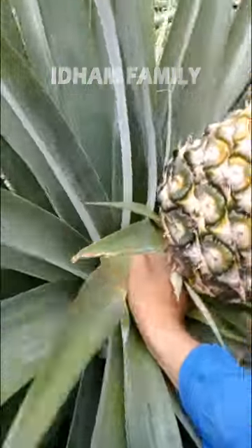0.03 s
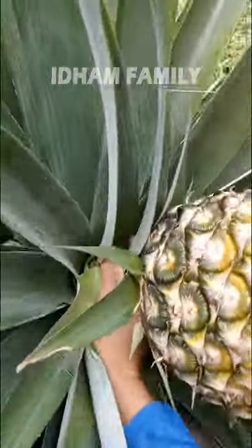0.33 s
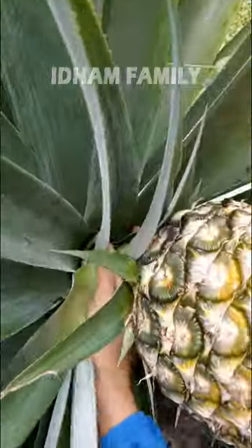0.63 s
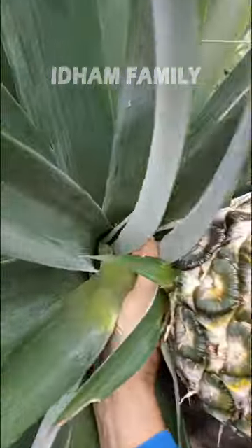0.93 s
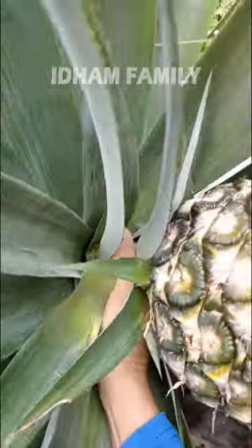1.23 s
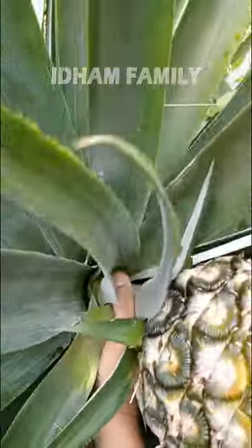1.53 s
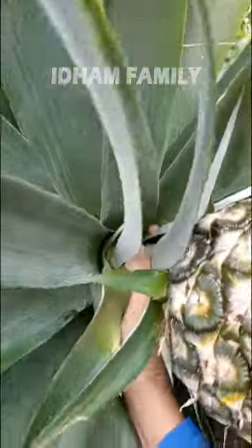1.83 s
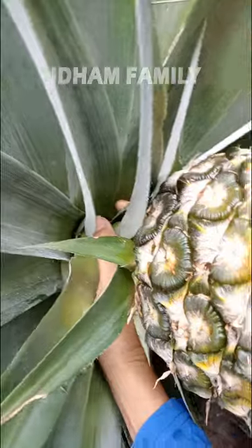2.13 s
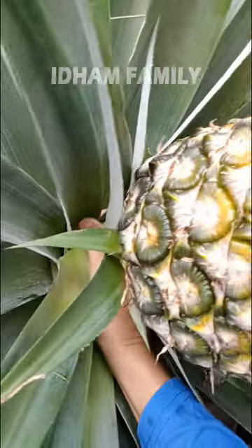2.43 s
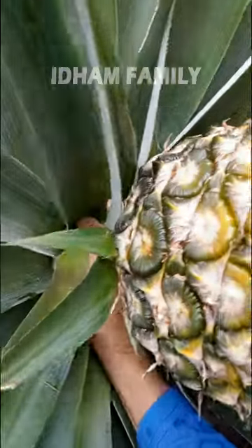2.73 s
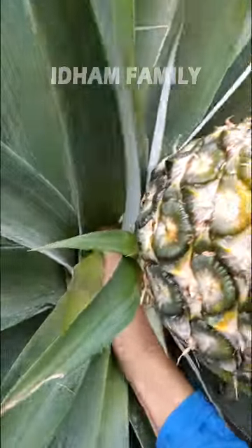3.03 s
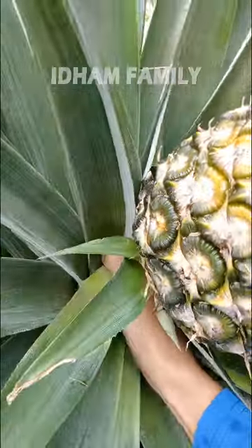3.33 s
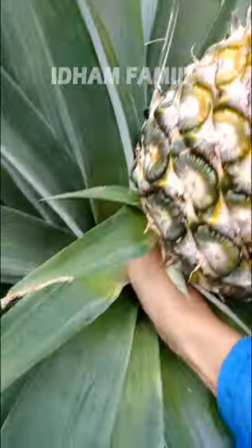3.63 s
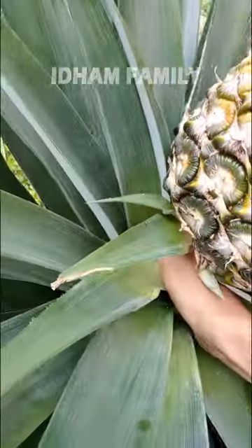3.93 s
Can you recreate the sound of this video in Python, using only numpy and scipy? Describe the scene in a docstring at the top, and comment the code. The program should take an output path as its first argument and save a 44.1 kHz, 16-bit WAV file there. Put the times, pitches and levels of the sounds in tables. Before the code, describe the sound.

Close up and outdoors, a hand moves stiff leaves in an uneven, crackling rustle dotted with short rasps and sharp snaps. The rustle eases midway, then builds again, while the stalk knocks softly over a faint low breeze.

```python
"""Hand in a pineapple plant

Outdoors, close to the microphone, a hand pushes in among the stiff leaves. Waxy blades slide over
each other in a fine stick-slip rustle, toothed edges rasp, spines flick and bent leaves snap free.
The heavy plant thuds dully as it is shifted; faint wind lies underneath."""
import sys
import numpy as np
from scipy import signal
from scipy.fft import rfft, irfft
from scipy.io import wavfile
from scipy.ndimage import uniform_filter1d

SR = 44100
rng = np.random.default_rng(int(sys.argv[2]) if len(sys.argv) > 2 else 0)


def inscribe(sig):
    """Save sig as 16-bit PCM at rate SR to the path in sys.argv[1].

    A 1-D sig is mono; a 2-D sig holds one channel per row.
    Samples are clipped to [-1, 1] before scaling.
    """
    pcm = np.round(np.clip(np.atleast_2d(sig).T, -1, 1) * 32767)
    wavfile.write(sys.argv[1], SR, pcm.astype(np.int16))


N = 176400
TIME = np.arange(N) / SR

# The leaves sliding. Each row: time in seconds, then the levels of dull rub, rustle and fizz in dB.
SLIDE_LEVELS = [(0.04, -33, -35, -41), (0.11, -43, -42, -47), (0.34, -39, -35, -37), (0.39, -40, -38, -47),
                (0.56, -38, -38, -49), (0.67, -41, -43, -50), (0.78, -40, -40, -48), (0.86, -45, -35, -45),
                (0.96, -45, -35, -45), (1.04, -48, -50, -56), (1.15, -41, -38, -50), (1.27, -49, -46, -56),
                (1.92, -53, -48, -59), (2.08, -49, -47, -58), (2.2, -48, -42, -55), (2.48, -39, -43, -54),
                (2.8, -58, -54, -63), (3.04, -42, -43, -51), (3.3, -43, -42, -52), (3.38, -41, -39, -47),
                (3.55, -44, -38, -45), (3.61, -43, -46, -52), (3.67, -41, -35, -40), (3.79, -34, -37, -43),
                (3.88, -44, -45, -52), (4.0, -42, -42, -47)]
# The rustle of the leaf edges. Each row: frequency in Hz, gain in dB.
RUSTLE_COLOUR = [(600, -8), (1500, -10), (3000, 3), (4000, -0.5), (4900, -12.5), (12000, -49)]
# The bright fizz of the waxy skin. Each row: frequency in Hz, gain in dB.
FIZZ_COLOUR = [(3000, -39), (5000, -3.5), (7600, -2.5), (9500, 6), (11200, -5), (16000, -16)]
CATCHES_PER_S = 170
PATCH_RANGE_HZ, PATCH_DECAY_S = (2300, 3900), 0.0006  # the note of a small patch of leaf


def amp(db):
    """Decibels to gain."""
    return 10 ** (np.asarray(db) / 20)


def unit(x):
    """Scales to rms 1."""
    return x / np.sqrt(np.mean(x ** 2) + 1e-20)


def burst(x, level_db, span_s=0.009):
    """Gives a short sound the energy of level_db held for span_s."""
    return x / np.linalg.norm(x) * np.sqrt(span_s * SR) * amp(level_db)


def add(mix, start_s, sound):
    """Mixes a sound in at start_s."""
    part = mix[max(round(start_s * SR), 0):][:len(sound)]
    part += sound[:len(part)]


def colour(x, points, size=4096):
    """Minimum-phase filter with the given (Hz, dB) outline."""
    points_hz, points_db = np.transpose(points)
    hz = abs(np.fft.fftfreq(size, 1 / SR))
    log_gain = np.log(amp(np.interp(np.log(hz + 1), np.log(points_hz), points_db)))
    taps = np.fft.ifft(np.exp(np.conj(signal.hilbert(log_gain)))).real
    return signal.fftconvolve(x, taps[:size // 2])[:len(x)]


def wander(rate_hz):
    """Smooth random motion of rms 1, mostly slower than rate_hz."""
    rolloff = 1 + (np.fft.rfftfreq(N, 1 / SR) / rate_hz) ** 4
    return unit(irfft(rfft(rng.standard_normal(N)) / rolloff, N))


def slips(per_s, spread_db):
    """Tiny random slips, mostly small, a few large."""
    size = amp(spread_db * np.minimum(rng.exponential(1, N), 5))
    return unit(size * rng.choice([-1., 1.], N) * (rng.random(N) < per_s / SR))


def catches(per_s, spread_db=14):
    """Sparse catches of leaf on leaf, their sizes spread evenly in decibels."""
    size = amp(-spread_db * rng.random(N))
    return size * np.sign(rng.standard_normal(N)) * (rng.random(N) < per_s / SR)


def ping(t, hz, decay_s):
    """The short note of a damped blade."""
    return np.sin(2 * np.pi * hz * t) * np.sqrt(t) * np.exp(-t / decay_s)


def moving_contact(x, depth_db, frame=512):
    """Narrow resonances come and go as the point of contact moves."""
    spectra = signal.stft(x, nperseg=frame)[2]
    field = rng.standard_normal(spectra.shape)
    for axis in (0, 1):  # smooth over frequency, then time
        field = uniform_filter1d(field, size=4, axis=axis)
    return signal.istft(spectra * amp(depth_db * unit(field)), nperseg=frame)[1][:len(x)]


def wind(level_db=-49.5, gust_db=3.0):
    """A faint, low breeze that swells and sinks unevenly."""
    # Each row: frequency in Hz, gain in dB.
    breeze_colour = [(32, -52), (64, -4), (130, 3), (450, -20), (16000, -45)]
    breeze = unit(colour(rng.standard_normal(N), breeze_colour))
    return breeze * amp(level_db + gust_db * wander(rate_hz=4.0))


def stalk_thuds(attack_s=0.0019):
    """Hollow, quickly damped shudders of the stalk as the plant shifts."""
    # Each row: start in seconds, level in dB before the envelope, decay in seconds, pitch in Hz.
    knocks = [(1.162, -32, 0.0083, 520), (1.976, -35.5, 0.047, 119), (2.447, -32, 0.018, 405),
              (3.238, -30, 0.02, 328), (3.362, -28.5, 0.012, 503), (3.792, -26.5, 0.055, 105)]
    out, t = np.zeros(N), TIME[:SR // 3]
    for start_s, level_db, decay_s, hz in knocks:
        stalk = signal.iirpeak(hz, Q=0.76, fs=SR)
        noise = rng.standard_normal(len(t))
        shudder = unit(signal.lfilter(*stalk, signal.lfilter(*stalk, noise)))
        envelope = np.minimum(t / attack_s, 1) * np.exp(-t / decay_s)
        add(out, start_s, amp(level_db) * shudder * envelope)
    return out


def spine_ticks(decay_s=0.0023):
    """Single spines flick past an edge: a scratch, the note of a patch of leaf and a bright sizzle."""
    # Each row: start in seconds, body level in dB, sizzle level in dB.
    flicks = [(0.1258, -33, -45), (0.3537, -27, -32.5), (0.7376, -31, -46), (.817, -31.5, -42),
              (1.13, -32.5, -49), (1.336, -30.5, -42.5), (1.568, -50, -45.5), (1.7604, -43, -50),
              (2.038, -36.5, -54), (2.261, -43, -48.5), (2.363, -33, -60), (3.0352, -28.5, -60),
              (3.054, -42, -41), (3.1497, -25, -45), (3.213, -37, -39.5), (3.4373, -26.5, -35),
              (3.476, -30, -37), (3.851, -33, -45)]
    out, t = np.zeros(N), TIME[:1024]
    for start_s, body_db, sizzle_db in flicks:
        scratch = rng.standard_normal(len(t)) * np.exp(-t / decay_s)
        note = ping(t, rng.uniform(*PATCH_RANGE_HZ), PATCH_DECAY_S)
        body = unit(note) + unit(colour(scratch, RUSTLE_COLOUR))
        sizzle = colour(scratch, FIZZ_COLOUR)
        add(out, start_s, burst(body, body_db) + burst(sizzle, sizzle_db))
    return out


def leaf_crackle(patches=16):
    """Dry crackles within the rustle: each catch rings a patch of leaf at its own pitch."""
    times_s, _, rustle_db, _ = np.transpose(SLIDE_LEVELS)
    grains = np.zeros(N)
    for hz in np.geomspace(*PATCH_RANGE_HZ, patches):
        note = ping(TIME[:1024], hz, PATCH_DECAY_S)
        grains += signal.oaconvolve(catches(CATCHES_PER_S / patches), note)[:N]
    return unit(grains) * amp(np.interp(TIME, times_s, rustle_db) - 5.5)


def sliding_leaves():
    """Clumps of stick-slip grains excite the broad blades, their edges and their waxy skin."""
    # The dull rub of the blades. Each row: frequency in Hz, gain in dB.
    rub_colour = [(100, -30.5), (260, -2.5), (400, -0.5), (850, -8.5), (2400, -9), (5000, -61)]
    times_s, rub_db, rustle_db, fizz_db = np.transpose(SLIDE_LEVELS)
    pressure_db = 0.95 * wander(rate_hz=45)  # uneven pressure moves all three registers together
    snags = 0.42 * unit(catches(CATCHES_PER_S))
    out = np.zeros(N)
    for outline, level_db in [(rub_colour, rub_db), (RUSTLE_COLOUR, rustle_db), (FIZZ_COLOUR, fizz_db)]:
        grain = moving_contact(slips(per_s=5000, spread_db=2.0), depth_db=3.0) + snags
        flicker_db = 1.54 * wander(rate_hz=78)
        friction = colour(grain * amp(pressure_db + flicker_db), outline)
        out += unit(friction) * amp(np.interp(TIME, times_s, level_db))
    return out


def edge_rasps(chatter_db=3, chatter_hz=270):
    """A row of small teeth drags across a blade: a swelling, chattering burst of slips that rings it."""
    # Each row: start and length in seconds, rasp and fizz levels in dB, ring pitch in Hz.
    drags = [(0.006, 0.048, -33, -38, 4640), (0.267, 0.007, -28, -33.5, 3370),
             (0.302, 0.014, -29, -27.5, 3680), (0.695, 0.023, -33, -35, 3030),
             (1.407, 0.029, -36, -46, 1860), (1.866, 0.0083, -30, -60, 3050),
             (2.521, 0.034, -34, -67, 4100), (2.988, 0.026, -32.5, -48, 1650),
             (3.025, 0.034, -31, -61, 3930), (3.493, 0.017, -28.5, -46, 1950),
             (3.732, 0.016, -28.5, -58, 1050)]
    out = np.zeros(N)
    teeth = unit(slips(per_s=11000, spread_db=1.5) * amp(chatter_db * wander(chatter_hz)))
    scrape, fizz = colour(teeth, RUSTLE_COLOUR), colour(teeth, FIZZ_COLOUR)
    for start_s, length_s, rasp_db, fizz_db, hz in drags:
        on = (TIME >= start_s) & (TIME < start_s + length_s)
        swell = np.sqrt(abs(np.sin(np.pi * (TIME[on] - start_s) / length_s)))
        ring = signal.lfilter(*signal.iirpeak(hz, Q=9, fs=SR), scrape[on])
        rasp = unit(scrape[on] + 2.5 * ring)
        out[on] += swell * (amp(rasp_db) * rasp + amp(fizz_db) * unit(fizz[on]))
    return out


def leaf_snaps(crack_db=-14, ring_db=-16, tail_db=-26, tail_s=0.008):
    """A sharp release and brief chatter ring the damped blade; nearby leaves scatter a short tail."""
    # Each row: start in seconds, overall gain in dB, then knock, clack and sizzle levels in dB
    # before that gain, ring pitch in Hz.
    releases = [(0.1917, -14, -25.5, -21, -16.5, 2780), (0.9797, -1, -32.5, -20.5, -19, 3150),
                (1.013, -18.5, -4.5, -23, -19, 2500), (1.1963, -12.5, -16, -12.5, -26, 2410),
                (1.4199, -13.5, -22, -18, -30, 2523), (1.6483, -11.5, -17, -12, -20, 3210),
                (2.4286, -9.5, -23, -24, -24.5, 2440), (2.627, -17.5, -24, -18.5, -16.5, 3680),
                (3.3579, -9.5, -19, -23, -25, 2610), (3.7913, -11, -13, -23, -22.5, 2770),
                (3.9408, -16.5, -36, -17, -19.5, 2120)]
    # The resonances of a stiff blade. Each row: frequency in Hz, gain in dB.
    blade_colour = [(450, -0.5), (850, -5), (3100, 8), (5600, -8.5), (7800, -5.5), (9400, 4), (12000, -13)]
    # Four bands, low to high: knock, clack, crack, sizzle. Their edges in Hz, their decays in seconds.
    edges_hz = [300, 800, 2000, 4800, 16000]
    decays_s = [0.006, 0.0025, 0.0028, 0.0019]
    out, t = np.zeros(N), TIME[:4096]
    spike = 4.7 * (t == 0)
    tail = amp(tail_db) * np.exp(-t / tail_s)
    for start_s, gain_db, knock_db, clack_db, sizzle_db, hz in releases:
        chatter = rng.standard_normal(len(t))
        snap = burst(ping(t, hz, decay_s=0.00093), ring_db)
        for k, level_db in enumerate([knock_db, clack_db, crack_db, sizzle_db]):
            drive = spike + chatter * (np.exp(-t / decays_s[k]) + tail)
            band = signal.butter(3, edges_hz[k:k + 2], "band", fs=SR, output="sos")
            snap += burst(colour(signal.sosfilt(band, drive), blade_colour), level_db)
        add(out, start_s, amp(gain_db) * snap)
    return out


def scene():
    """Leaves, stalk and breeze at one close microphone."""
    leaves = sliding_leaves() + leaf_crackle() + edge_rasps() + leaf_snaps() + spine_ticks()
    return (leaves + stalk_thuds() + wind())[None]


def record(dry, ceiling=0.53, cutoff_hz=15700):
    """The hardest snaps overload the microphone input; a low-pass then cuts the highest treble."""
    clipped = np.clip(dry, -ceiling, ceiling)
    lowpass = signal.firwin(255, cutoff_hz, window=("kaiser", 8), fs=SR)
    return signal.oaconvolve(clipped, lowpass[None], "same")


dry = scene()
out = record(dry)
inscribe(out)
```